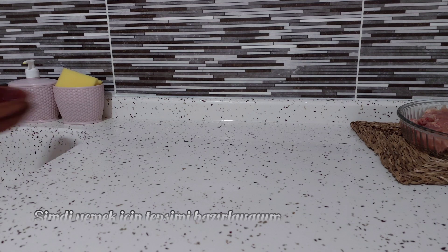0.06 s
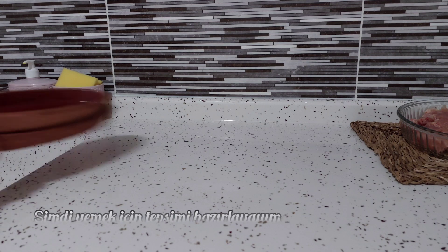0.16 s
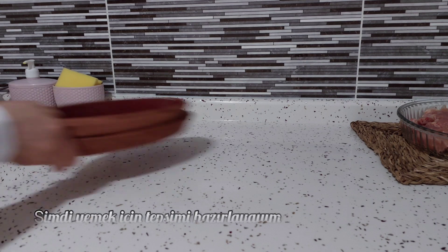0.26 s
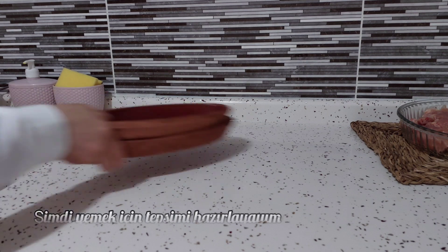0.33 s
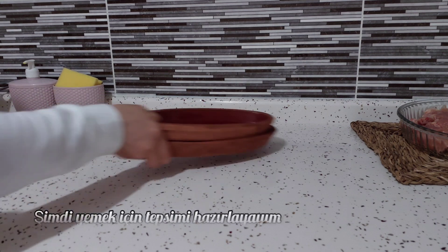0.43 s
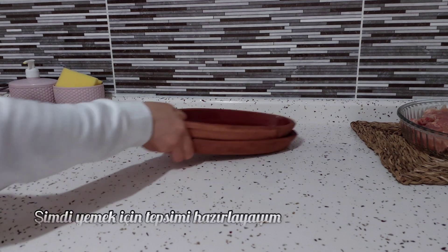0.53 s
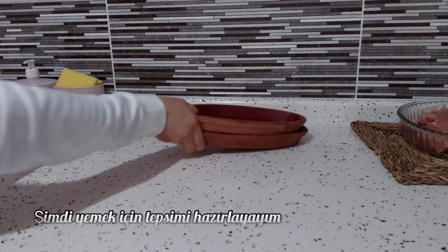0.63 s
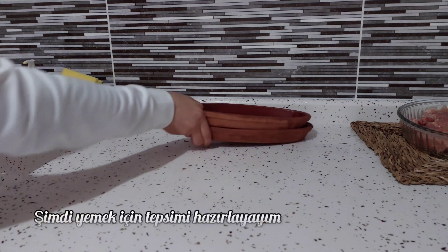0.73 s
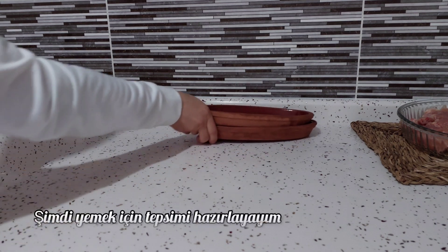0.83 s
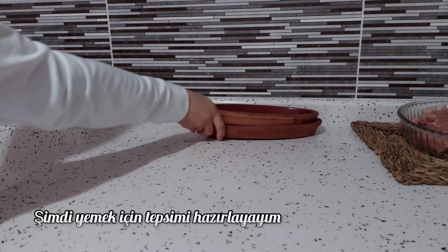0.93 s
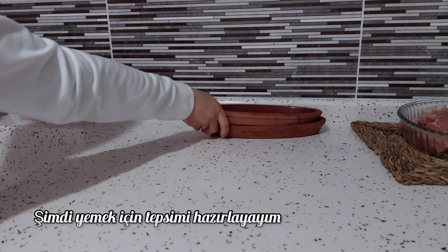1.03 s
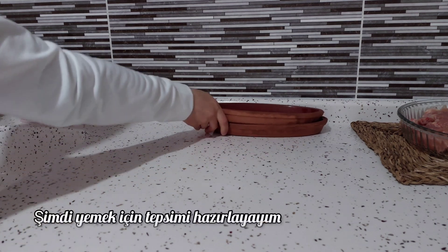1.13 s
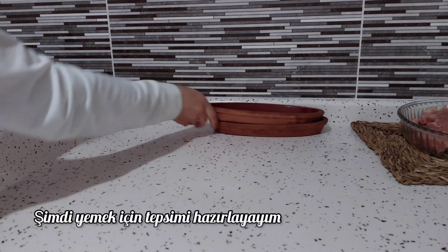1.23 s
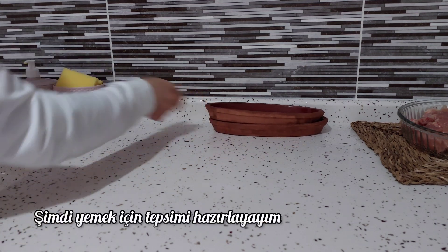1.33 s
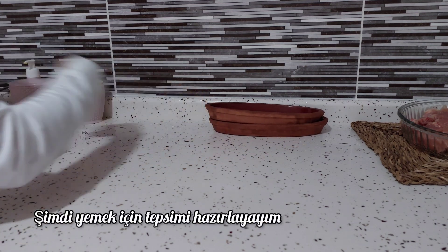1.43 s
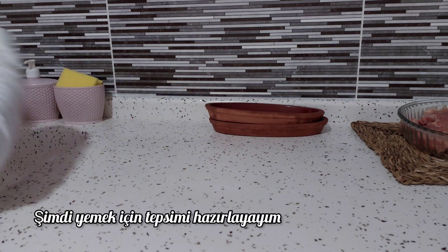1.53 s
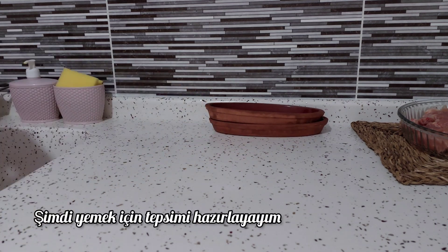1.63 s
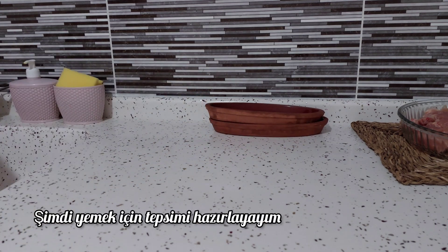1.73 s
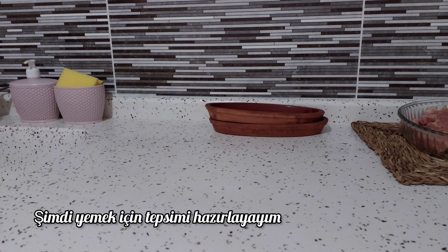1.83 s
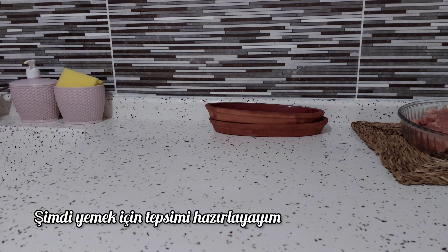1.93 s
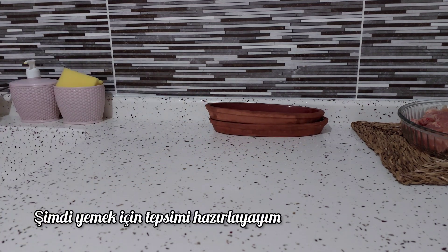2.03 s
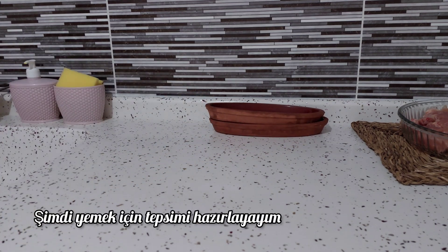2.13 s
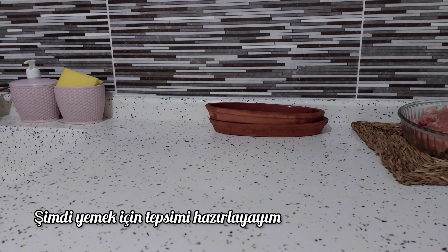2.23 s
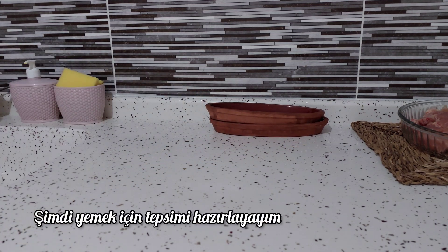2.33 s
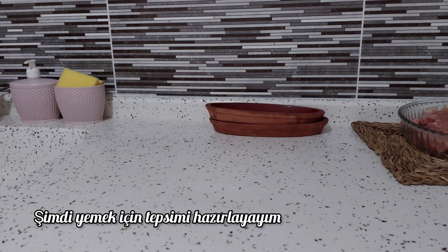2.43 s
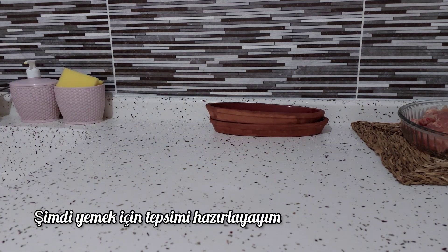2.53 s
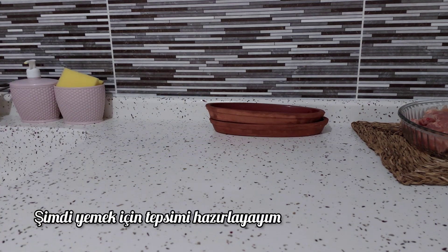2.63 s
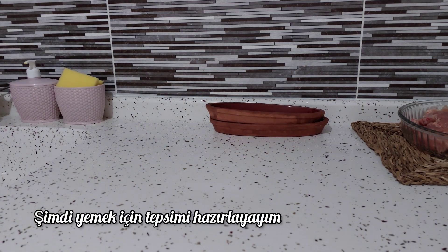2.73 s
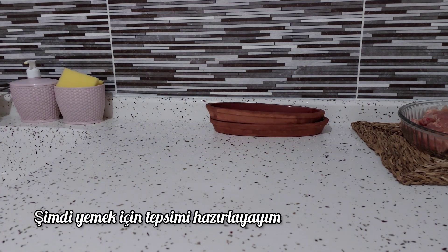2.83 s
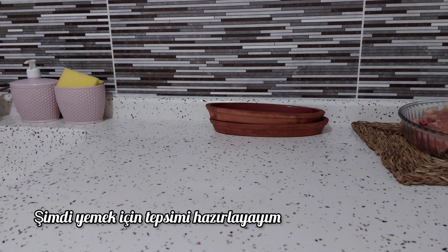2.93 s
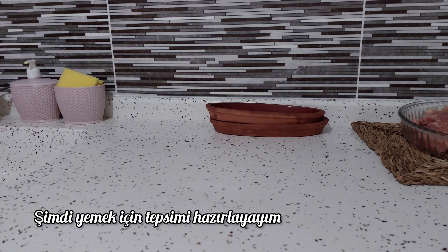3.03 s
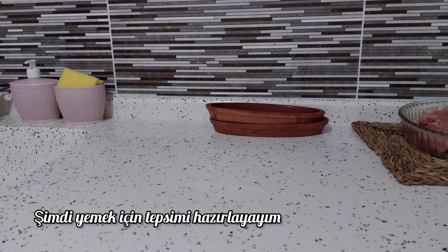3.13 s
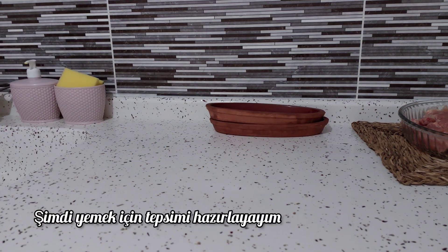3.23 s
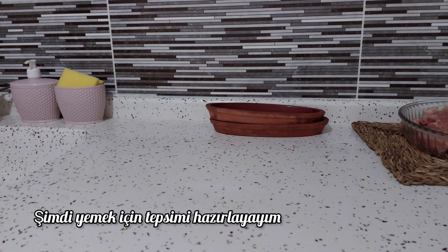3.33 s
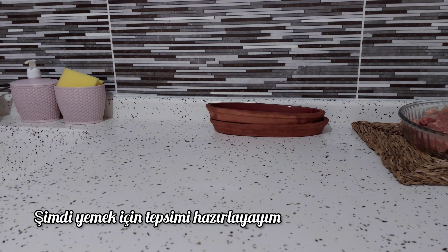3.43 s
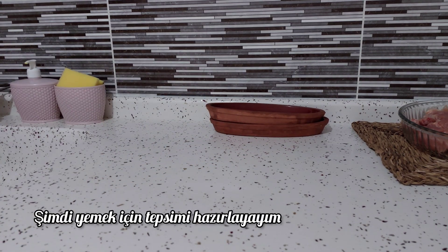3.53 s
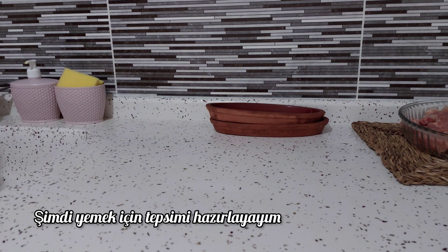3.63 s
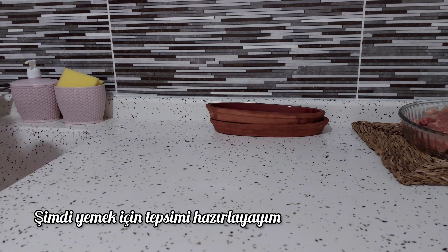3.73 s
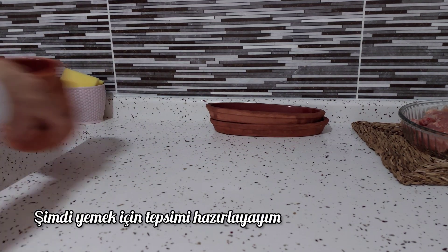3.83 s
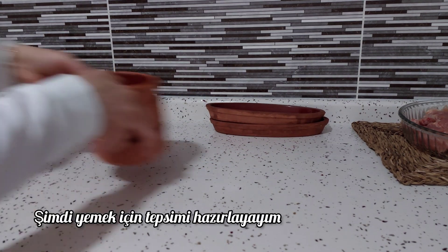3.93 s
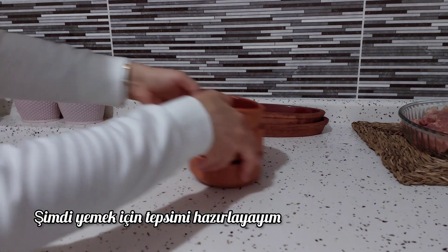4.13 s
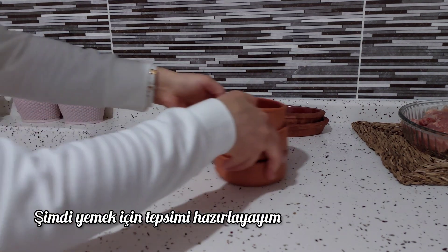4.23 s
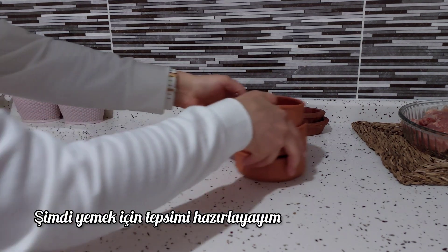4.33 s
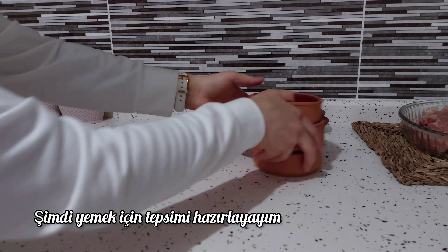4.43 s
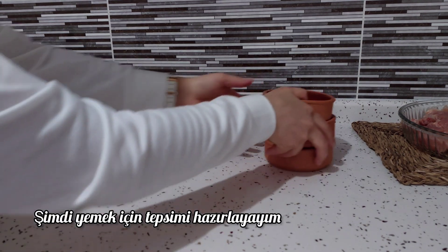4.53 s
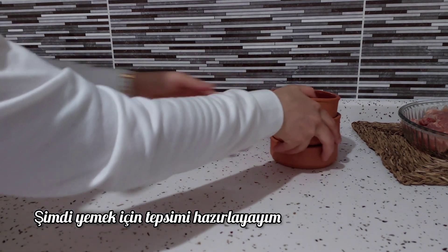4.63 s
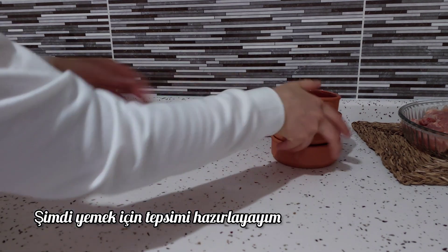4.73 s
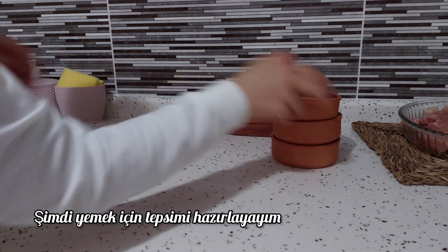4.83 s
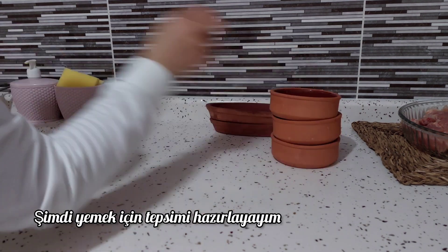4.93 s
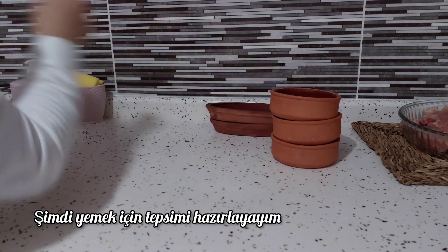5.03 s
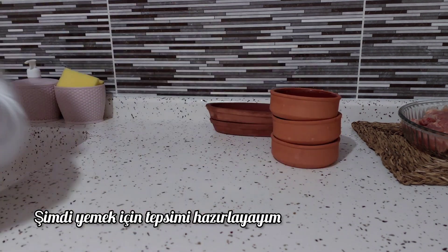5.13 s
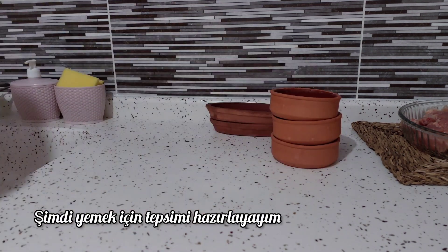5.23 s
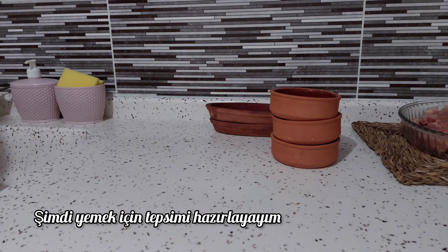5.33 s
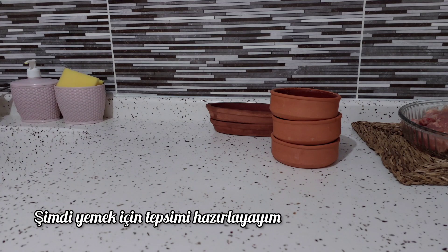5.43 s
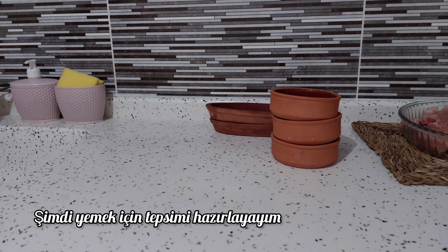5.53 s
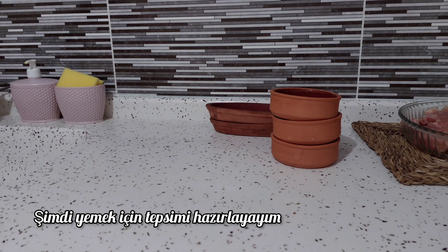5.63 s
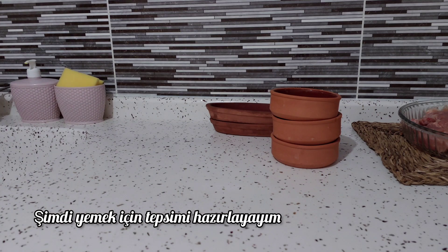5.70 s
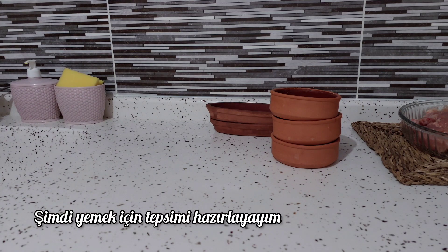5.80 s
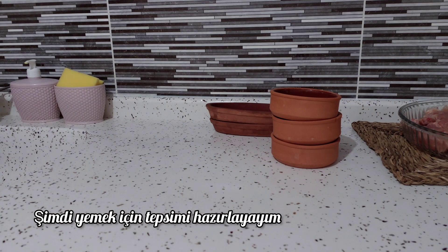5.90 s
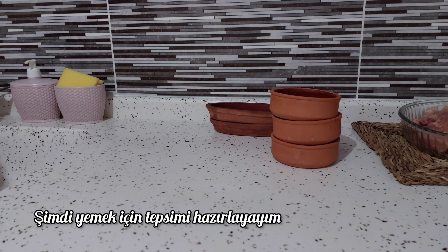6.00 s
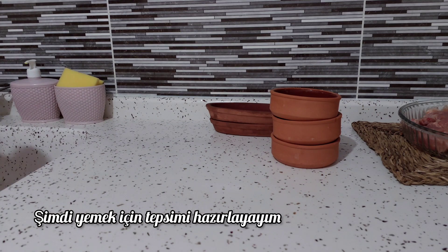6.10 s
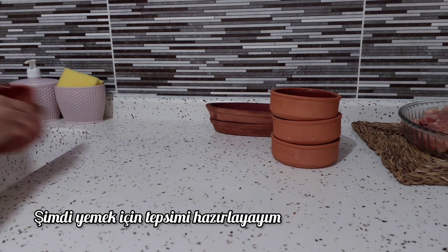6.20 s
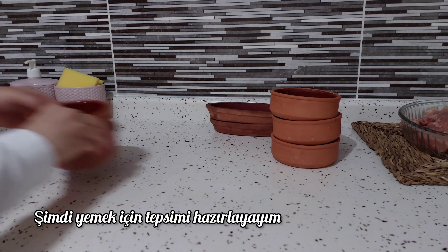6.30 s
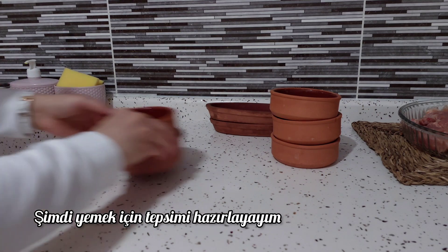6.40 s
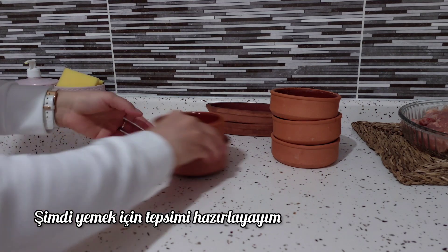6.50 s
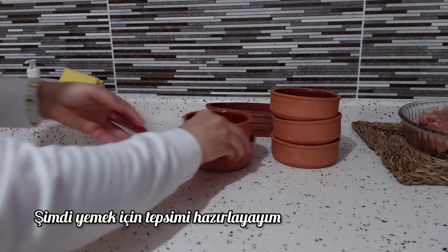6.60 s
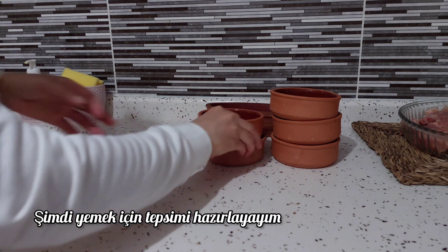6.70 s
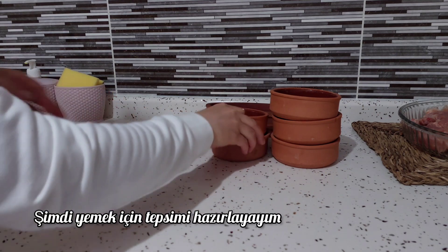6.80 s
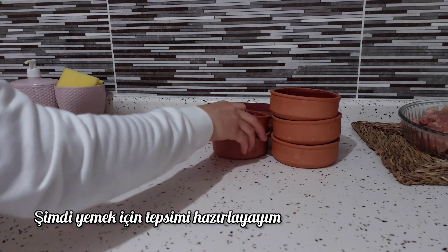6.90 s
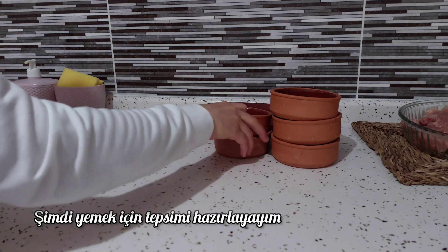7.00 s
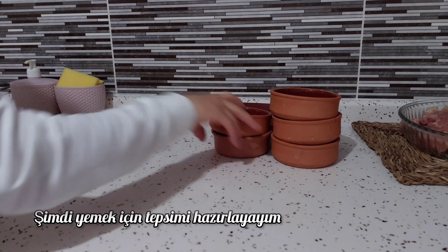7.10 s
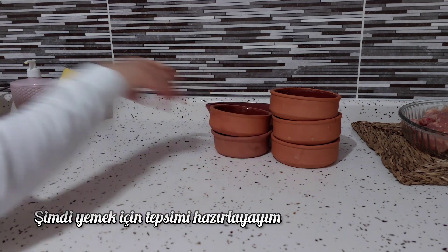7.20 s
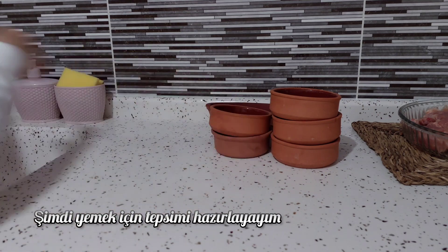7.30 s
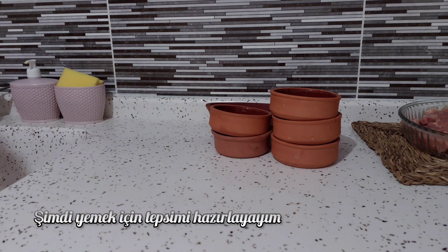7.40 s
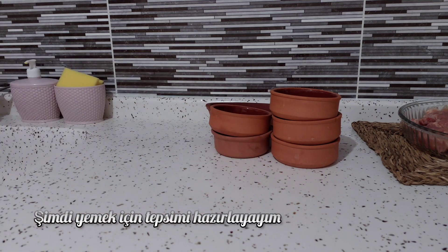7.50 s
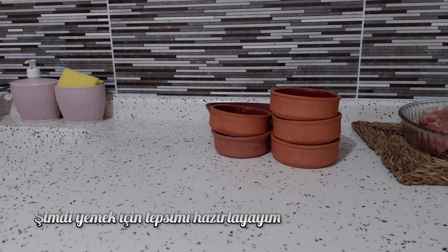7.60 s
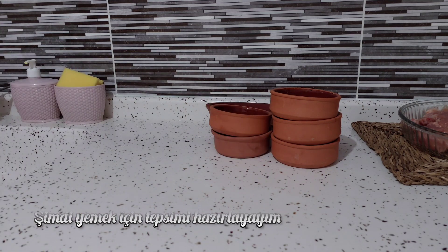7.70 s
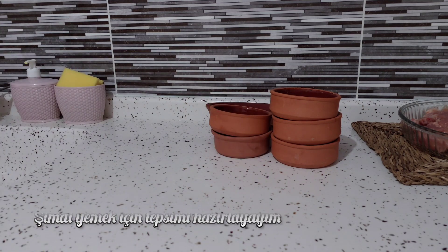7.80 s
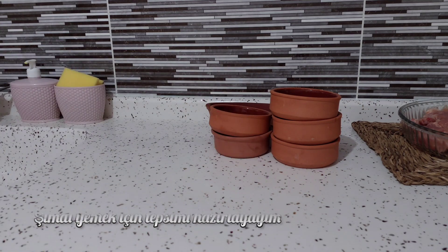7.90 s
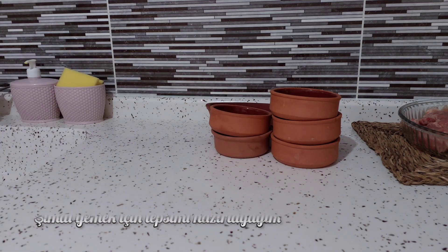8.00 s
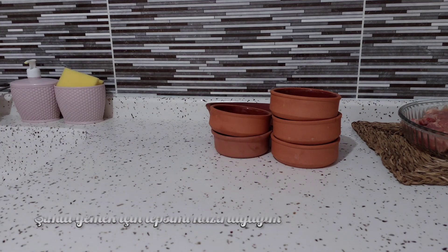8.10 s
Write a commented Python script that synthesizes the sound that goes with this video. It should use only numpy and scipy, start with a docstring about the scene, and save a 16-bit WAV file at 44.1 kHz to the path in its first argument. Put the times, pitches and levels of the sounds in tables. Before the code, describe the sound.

Unglazed clay ware is set down in three loads: dishes with dry clacks, a stack with one solid knock and a fading push, small bowls with livelier, longer-ringing knocks. Between them come duller, more distant cupboard bumps and very quiet scraping of bases and rims. The microphones are close; the tiled room adds a short reverberant tail over quiet low room tone.

```python
"""Clay ware set down on a stone counter

Two nested oval dishes, a stack of three bowls, then two small bowls of unglazed clay land: each contact is a
broadband knock plus damped modes. Between the loads, clay bumps in a cupboard in the same way.
Dragged bases stick and slip, and rubbing rims excite high modes, both as random slips driving resonances.
A hard tiled kitchen answers with decaying diffuse noise, over low room tone, a faint hum and a soft late hiss."""
import sys
import numpy as np
from scipy import signal
from scipy.fft import rfft, irfft, next_fast_len
from scipy.io import wavfile
from scipy.ndimage import map_coordinates

SR = 44100
rng = np.random.default_rng(int(sys.argv[2]) if len(sys.argv) > 2 else 0)


def file_out(sig):
    """Save sig as 16-bit WAV at sys.argv[1]."""
    # one column per channel
    cols = np.atleast_2d(sig).T
    # limit, then scale
    lim = np.clip(cols, -1, 1)
    pcm = np.round(lim * 32767).astype(np.int16)
    wavfile.write(sys.argv[1], SR, pcm)


N = 359415


def knocks(hits, modes, knock, scatter_db, scatter_t60, modes_db, sustain, room_db, left_db):
    """Impact excitation: a brief force gives a dead knock and sets the damped modes of the clay ringing."""
    out, t = np.zeros((2, N)), np.arange(SR) / SR
    hz, width, mode_db = np.transpose(modes)[:, :, None]
    pulse = unit_energy(causal(knock))
    first = causal([(3500, -3.0), (11000, -12)])  # the contact lasts too long for the top treble
    mode_chance_db = 1.5  # standard deviation of a mode's strength
    for s, db, thud_db, pitch_hz, lift_db, bright_db in hits:
        # The push arrives first; counter and tiles scatter it within milliseconds.
        scatter = diffuse(SR) * amp(-60 * t / scatter_t60) * (1 - np.exp(-t / 0.00034))
        push = amp(scatter_db) * unit_energy(scatter)
        push[:, :len(first)] += first
        blow = through(push, pulse)

        # The point of contact decides how strongly each mode rings.
        strength = width / hz * amp(mode_db + mode_chance_db * rng.standard_normal(hz.shape))
        # Each microphone gets its own phase, more so in the treble.
        spread = np.minimum(hz / 3000, 1) * rng.standard_normal((2, len(hz), 1))
        phase = rng.uniform(0, 2 * np.pi, hz.shape) + spread
        early = t[:SR // 4]
        decay = np.exp(-np.pi * width * early / sustain)
        ring = np.sum(strength * decay * np.sin(2 * np.pi * hz * early + phase), axis=1)
        onset = 1 - np.exp(-(early / 0.00057) ** 2)
        radiated = np.diff(ring * onset, prepend=0)  # a small wall radiates little bass
        blow[:, :len(early)] += amp(modes_db) * unit_energy(radiated)

        # A flat landing thuds, an edge clinks, and the spot that touches favours one pitch.
        tilt = causal([(180, thud_db), (450, 0), (2000, 0), (6000, bright_db)])[:SR // 40]
        favoured = [(pitch_hz / np.sqrt(2), 0), (pitch_hz, lift_db), (pitch_hz * np.sqrt(2), 0)]
        contact = np.convolve(tilt, causal(favoured)[:SR // 40])
        blow = 10 * amp(db) * through(blow, contact)
        add(out, s, blow + amp(room_db) * kitchen(blow))
    return out * amp([[left_db / 2], [-left_db / 2]])


def dishes():
    """Modal impact of two nested oval dishes: narrow resonances over a wide-band knock."""
    # Each row: start in seconds, relative level in dB, thud in dB, favoured pitch in Hz, its lift in dB,
    # brightness in dB.
    hits = [(.5352, -25, 0, 860, 4.5, 0), (.5372, -23.5, -0.5, 2504, 2, 3), (.7897, -27, 3, 1564, 10, -6.5),
            (.954, -38, -2, 1500, -4.5, 1.5), (.9625, -23, -5.5, 1450, 4, 1),
            (.9755, -26, -3, 2300, 7.5, 2), (.9773, -24.5, -1.5, 2567, 5, 6)]
    # Modes of the clay. Each row: frequency in Hz, width in Hz before sustain divides it, relative level in dB.
    modes = [(690, 60, -5), (722.2, 45, -3), (892, 15, -2.5), (1193, 50, 3.5), (1310, 70, 0.5),
             (1505, 18, -9), (1830, 60, 1.5), (1905, 88, 0), (2232, 34, 1), (2563, 15, 0), (3210, 30, -4),
             (3754, 26, -9.5), (5442, 50, -14.5), (7200, 34, -22.5)]
    # Knock of clay on its support. Each row: frequency in Hz, relative spectral level in dB per Hz.
    knock = [(30, -33), (90, -14), (160, -15), (240, -22.5), (320, -13), (430, -19), (600, -15.5),
             (800, -8), (1500, -15.5), (1950, -13), (2700, -21.5), (3700, -26.5), (5400, -31),
             (6600, -43.5), (7700, -37), (8900, -48), (15000, -55)]
    return knocks(hits, modes, knock, scatter_db=3.5, scatter_t60=0.027, modes_db=5, sustain=0.75,
                  room_db=0, left_db=1.54)


def stack():
    """Modal impact of three stacked bowls: one firm contact, then two weak and thudding ones."""
    # Each row: start in seconds, relative level in dB, thud in dB, favoured pitch in Hz, its lift in dB,
    # brightness in dB.
    hits = [(4.1678, -20.5, -3, 969, 5.6, 0), (4.279, -36.5, 14, 578, 11.7, -9.5),
            (4.294, -51.5, 17, 650, 8, -10)]
    # Modes of the clay. Each row: frequency in Hz, width in Hz before sustain divides it, relative level in dB.
    modes = [(574, 340, -7), (1091, 37, -9), (1850, 130, -23.5), (2760, 62, -22), (3570, 42, -35),
             (4030, 67, -24.5), (4270, 13, -19.5), (4775, 46, -31), (6440, 88, -17), (7890, 12, -27.5),
             (9400, 30, -31), (12700, 44, -39)]
    # Knock of clay on its support. Each row: frequency in Hz, relative spectral level in dB per Hz.
    knock = [(30, -56.5), (90, -9.5), (160, -4), (250, -7.5), (400, -7.5), (550, 3), (1000, -0.5),
             (1400, 1.5), (1800, 10), (2500, -1.5), (3200, -9.5), (4000, -3), (5400, -31.5), (6500, -25),
             (7400, -37), (11000, -41), (12500, -27), (15000, -58.5)]
    return knocks(hits, modes, knock, scatter_db=4.0, scatter_t60=0.018, modes_db=1.0, sustain=0.87,
                  room_db=1.2, left_db=0.5)


def bowls():
    """Modal impact of two small bowls: their light damping lets the modes ring on."""
    # Each row: start in seconds, relative level in dB, thud in dB, favoured pitch in Hz, its lift in dB,
    # brightness in dB.
    hits = [(6.557, -21, -7, 760, 1.2, 0), (6.5595, -26.5, 6, 750, 9.1, 9),
            (6.6812, -24, -10, 1150, 4.1, -3), (6.7078, -22, -3.5, 1150, 5.5, 5.5),
            (6.7135, -30.5, 1, 800, 2.3, -3)]
    # Modes of the clay. Each row: frequency in Hz, width in Hz before sustain divides it, relative level in dB.
    modes = [(345, 35, -6.5), (357, 67, -4.5), (770, 43, -3), (783, 21, -11.5), (980, 12, -3),
             (1158, 61, -1), (1414, 27, -3), (1780, 15, -6), (2260, 50, -2), (2590, 40, -13),
             (3487, 67, -12.5), (4170, 35, -7.5), (6060, 63, -28.5), (7580, 53, -20.5), (8800, 130, -29),
             (13200, 200, -33.5)]
    # Knock of clay on its support. Each row: frequency in Hz, relative spectral level in dB per Hz.
    knock = [(30, -22), (90, -8.5), (240, -13.5), (350, -28), (520, -9), (760, 3), (1150, -3.5),
             (1700, -2.5), (2400, -7), (4100, -20), (5300, -26.5), (8000, -36.5), (10000, -37.5),
             (15000, -39.5)]
    return knocks(hits, modes, knock, scatter_db=5.5, scatter_t60=0.05, modes_db=2, sustain=1.3,
                  room_db=-3.5, left_db=1.1)


def cupboard():
    """Modal impact of clay in a cupboard further off: strong damping, and more reverberant sound."""
    # Each row: start in seconds, relative level in dB, thud in dB, favoured pitch in Hz, its lift in dB,
    # brightness in dB.
    hits = [(2.214, -67, 6, 800, 14, -27), (2.24, -51.5, 12, 1120, 7.5, -25),
            (2.331, -52, 12.5, 765, 2.5, -28), (2.809, -40, 3, 1960, 1, -9),
            (2.889, -41.5, -4, 716, 7, -29), (2.907, -26, -1, 990, 2, 4), (2.914, -30.5, 5, 1600, 5, 10.5),
            (5.585, -58, 21, 1920, 2, -29), (5.612, -59, 9, 380, 13, -16), (5.632, -73, 21, 374, 25, -8)]
    # Modes of the clay. Each row: frequency in Hz, width in Hz before sustain divides it, relative level in dB.
    modes = [(180, 180, -11), (353, 23, -26.5), (875, 110, -14.5), (1485, 29, -31), (2050, 58, -13),
             (3690, 68, -25), (4080, 60, -23.5), (4770, 100, -47), (6460, 58, -32.5), (7900, 60, -49),
             (9500, 70, -43)]
    # Knock of clay on its support. Each row: frequency in Hz, relative spectral level in dB per Hz.
    knock = [(30, -33), (70, -3), (120, -4.5), (195, 0), (270, -12), (400, -2), (620, 8), (950, 6.5),
             (1400, -1), (2300, -3.5), (3200, -19), (4100, -18.5), (5500, -53), (15000, -54)]
    return amp(1.5) * knocks(hits, modes, knock, scatter_db=0.5, scatter_t60=0.14, modes_db=-2.9, sustain=0.45,
                             room_db=3.0, left_db=1.1)


def sliding(soft_hz=2800, room_db=-4):
    """Stick-slip friction: slips of a dragged base ring the vessel's resonances, and a hard stick squeaks."""
    # The stack's resonances as it is pushed into place.
    # Each row: frequency in Hz, width in Hz, relative level in dB.
    push_modes = [(151, 90, -7), (318, 63, -7.5), (670, 71, -1), (1074, 130, -6), (1470, 500, -8.5),
                  (2090, 250, -16)]
    # Bases dragged over their support. Each row: start in seconds, length in seconds, relative level in dB,
    # low resonance in Hz, high resonance in Hz, level of the high one against the low in dB, width in Hz.
    slides = [(2.227, 0.086, -68, 1100, 2220, -20, 218), (2.46, 0.2, -75, 1098, 2140, -5, 148),
              (3.413, .11, -71.5, 634, 1890, -5.5, 110), (3.51, .18, -75.5, 629, 2020, 1.5, 117),
              (5.91, 0.066, -63.5, 618, 1700, -7, 309), (6.133, 0.098, -68, 656, 2240, -3.5, 100),
              (6.328, 0.11, -58, 975, 2180, -12.5, 150), (6.877, 0.09, -56, 374, 845, -0.5, 231)]
    # Squeaks of a sticking base. Each row: time of the peak in seconds, relative level in dB, pitch in Hz.
    squeaks = [(4.286, -32.5, 593.3), (6.433, -45, 983)]
    push_start_s, push_length_s, push_db, slowing_db_per_s = 4.3, 0.35, -47, 45.5
    squeak_s, squeak_knots_per_s = 0.0084, 120  # time from the peak to 1/e, rate of the phase wobble
    t = np.arange(N) / SR

    # The pushed stack slows to rest.
    slowing = amp(push_db - slowing_db_per_s * np.maximum(t - push_start_s, 0))
    resonances = sum(amp(db) * slipping(hz, width) for hz, width, db in push_modes)
    out = slowing * stroke(push_start_s, push_length_s) * resonances
    for start, length, db, low_hz, high_hz, high_db, width_hz in slides:
        resonances = slipping(low_hz, width_hz) + amp(high_db) * slipping(high_hz, width_hz)
        out += amp(db) * stroke(start, length) * resonances
    for s, db, hz in squeaks:
        phase = 2 * np.pi * hz * t + wobble(squeak_knots_per_s, N)
        out += amp(db) * np.exp(-((t - s) / squeak_s) ** 2) * np.sqrt(2) * np.sin(phase)
    out = filtered(np.array([out, out]), lambda hz: 1 / (1 + (hz / soft_hz) ** 6))
    return out + amp(room_db) * kitchen(out)


def slipping(hz, width_hz):
    """Source-filter principle: uneven slips drive one two-pole resonance, brought to rms 1."""
    slips_per_s, creep = 600, 0.071  # creep: even friction between the slips, as a share of a slip
    pole = np.exp((2j * np.pi * hz - np.pi * width_hz) / SR)
    slips = rng.standard_normal(N) * ((rng.random(N) < slips_per_s / SR) + creep)
    return unit(signal.lfilter([1, 0, -1], np.real(np.poly([pole, pole.conjugate()])), slips))


def rubbing(grains_per_s=900, grit_db=-4, catch_t60=0.024, rub_db=-2, room_db=-5):
    """Friction excitation: tiny slips of gritty rims, and now and then a catch, drive the bowls' high modes."""
    # Strokes of rim on rim. Each row: start in seconds, length in seconds, relative level in dB.
    rubs = [(2.235, .05, -82.5), (2.352, 0.047, -71.5), (2.47, 0.099, -79), (3.349, 0.22, -68),
            (3.515, 0.13, -56.5), (4.296, .18, -62.5), (4.508, 0.16, -72), (5.564, 0.11, -66.5),
            (5.79, 0.09, -69.5), (5.918, 0.042, -54.5), (6.132, 0.13, -64.5), (6.328, 0.11, -58),
            (6.51, 0.032, -63), (6.88, 0.075, -58.5)]
    # Catches in the rubbing. Each row: time of the peak in seconds, relative level in dB.
    catches = [(3.535, -38), (3.586, -39.5), (3.626, -48), (3.676, -51.5), (6.348, -57), (6.389, -56.5)]
    # High modes of the rims. Each row: frequency in Hz, width in Hz, relative level in dB.
    rub_modes = [(3720, 70, -2.5), (4130, 20, -3.5), (4934, 58, -19), (6310, 61, -2), (7920, 60, -6),
                 (9575, 74, -6.5), (9200, 41, -5.5), (12700, 260, -11), (14870, 130, -8.5)]
    # Spectrum of the grit. Each row: frequency in Hz, relative level in dB per Hz.
    rub_colour = [(500, -35.5), (1200, -21.5), (2100, 8.5), (3000, -54), (3900, 12), (5200, -8.5),
                  (6400, 6), (8500, -14.5), (9600, -8.5), (11300, -2.5), (12800, -3), (15800, -4)]
    t = np.arange(N) / SR
    force = sum(amp(rub_db + db) * stroke(start, length) for start, length, db in rubs)
    for s, db in catches:
        rise = np.clip((t - s) / 0.0029 + 1, 0, 1)
        force = force + rise * amp(db - 60 * np.abs(t - s) / catch_t60)

    grains = (rng.random(N) < grains_per_s / SR) * rng.standard_normal((2, N))
    slips = unit(grains) + 1.01 * rng.standard_normal((2, N))  # grains over continuous friction
    short = t[:SR // 8]
    ring = sum(width * amp(db) * np.exp(-np.pi * width * short) * np.cos(2 * np.pi * hz * short)
               for hz, width, db in rub_modes)
    drive = slips * force
    grit = through(drive, unit_energy(causal(rub_colour)))
    rub = through(drive, unit_energy(ring)) + amp(grit_db) * grit
    return 0.35 * amp([[1], [-1]]) * (rub + amp(room_db) * kitchen(rub))  # slightly to the left


def stroke(start, length):
    """Force envelope: a quick attack, a hold with wavering grip, then exponential decay once the push ends."""
    attack_s, release_db_per_s = 0.029, 329
    grip_db, grip_knots_per_s = 3, 45
    t = np.arange(N) / SR - start
    waver_db = grip_db * wobble(grip_knots_per_s, N)
    return np.clip(t / attack_s, 0, 1) * amp(waver_db - release_db_per_s * np.clip(t - length, 0, 1))


def wobble(per_s, size):
    """Band-limited fluctuation: a smooth curve through per_s random knots a second."""
    at = np.arange(size) * per_s / SR
    return map_coordinates(rng.standard_normal(1024), [at], mode="wrap")


def kitchen(x, build_s=.005):
    """Reverberation: diffuse noise builds up quickly and decays in each band, the bass lingering longest."""
    # Reverberation time. Each row: frequency in Hz, time to fall by 60 dB in seconds.
    room_t60 = [(70, 0.96), (200, 0.65), (450, 0.63), (1000, 0.5), (2000, 0.41), (5000, .36), (12000, 0.28)]
    # Strength of the tail. Each row: frequency in Hz, relative level in dB.
    room_gain = [(40, 9.5), (70, 14), (105, 7), (150, 12.5), (205, 8.5), (260, -1), (340, 9), (500, 9.5),
                 (800, 0.5), (2000, 1), (6000, 2), (14000, 0)]
    hz, t, z = signal.stft(diffuse(SR), SR, nperseg=256)
    t60 = along(room_t60, hz)[:, None]
    even_energy = np.sqrt(2 * np.log(1000) / (t60 * SR))  # a longer tail is not a louder one
    fade = amp(along(room_gain, hz)[:, None] - 60 * t / t60) * even_energy
    tail = signal.istft(z * fade, SR, nperseg=256)[1][:, :SR]
    return through(x, tail * (1 - np.exp(-(np.arange(SR) / SR / build_s) ** 2)))


def diffuse(size):
    """Diffuse-field coherence: white stereo noise, alike in the bass and nearly unrelated in the treble."""
    # Each row: frequency in Hz, correlation of left and right (no unit).
    room_alike = [(120, 0.94), (270, 0.69), (500, 0.54), (1500, 0.25), (5000, 0.033)]

    def mid_side(hz):
        """Correlation as an angle: the shares of mid and side at constant power."""
        angle = np.arccos(np.clip(along(room_alike, hz), -1, 1)) / 2
        return np.array([np.cos(angle), np.sin(angle)])

    mid, side = filtered(rng.standard_normal((2, size)), mid_side)
    return np.array([mid + side, mid - side])


def background(air_db=1, hum_db=-1, hiss_db=1):
    """Stationary noise and tones: coloured low room tone, an appliance's hum, and two soft late hiss swells."""
    # Room tone over time. Each row: time in seconds, level in dB before air_db.
    air_level = [(0, -58), (.45, -64), (1.7, -70), (2.3, -61), (3.9, -63), (5.1, -68), (6.3, -63),
                 (7.4, -69.5), (7.9, -65.5)]
    # Spectrum of the room tone. Each row: frequency in Hz, relative level in dB per Hz.
    air_colour = [(22, -33), (45, -8), (70, -2.5), (130, 1), (165, -14), (200, -1.5), (250, -21), (300, -9),
                  (400, -19.5), (470, -14), (600, -23.5), (1000, -33), (2000, -43.5), (4500, -50.5),
                  (7500, -44.5), (15800, -47)]
    # Partials of the hum. Each row: frequency in Hz, level in dB before hum_db.
    hum_partials = [(123.5, -75), (200, -78), (240, -82), (297, -81), (461, -78.5)]
    # Swells of the hiss. Each row: time of the peak in seconds, level in dB before hiss_db.
    hiss_swells = [(7.821, -60), (7.98, -64)]
    # Spectrum of the hiss. Each row: frequency in Hz, relative level in dB per Hz.
    hiss_colour = [(180, -38.5), (300, -9), (477, -9.5), (896, -15.5), (1020, -15.5), (8990, -22),
                   (11900, -21), (15800, -19.5)]
    rise_db_per_s, fall_db_per_s = 230, 115.5
    t = np.arange(N) / SR
    air = unit(filtered(diffuse(N), lambda hz: amp(along(air_colour, hz))))
    hiss = unit(filtered(diffuse(N), lambda hz: amp(along(hiss_colour, hz))))
    swell = sum(amp(db - np.maximum(rise_db_per_s * (s - t), fall_db_per_s * (t - s))) for s, db in hiss_swells)
    hum = sum(np.sqrt(2) * amp(db) * np.sin(2 * np.pi * (hz * t + rng.random())) for hz, db in hum_partials)
    return amp(air_db) * level(air_level) * air + amp(hum_db) * hum + amp(hiss_db) * swell * hiss


def amp(db):
    """Logarithmic level: decibels to amplitude gain."""
    return 10 ** (np.asarray(db) / 20)


def unit(x):
    """Effective value: x scaled to rms 1."""
    return x / np.sqrt(np.mean(x ** 2) + 1e-20)


def unit_energy(x):
    """Energy normalization: x with a mean energy of 1 per channel."""
    return unit(x) / np.sqrt(x.shape[-1])


def along(points, hz):
    """Logarithmic frequency scale: (Hz, value) points interpolated on a log axis."""
    f, v = np.transpose(points)
    return np.interp(np.log(hz + 1), np.log(f + 1), v)


def level(rows):
    """Level envelope: gain per sample, linear in dB between (s, dB) rows."""
    s, db = np.transpose(rows)
    return amp(np.interp(np.arange(N) / SR, s, db))


def filtered(x, response):
    """Linear filtering: the spectrum of x times a response of frequency."""
    n = x.shape[-1]
    m = next_fast_len(n + 8192)
    return irfft(rfft(x, m) * response(np.fft.rfftfreq(m, 1 / SR)), m)[..., :n]


def causal(points, size=4096):
    """Minimum phase: folding the cepstrum of a (Hz, dB) spectrum gives a causal impulse response."""
    cepstrum = irfft(np.log(amp(along(points, np.fft.rfftfreq(size, 1 / SR)))))
    cepstrum[1:size // 2] *= 2
    cepstrum[size // 2 + 1:] = 0
    return irfft(np.exp(rfft(cepstrum)))


def through(x, response):
    """Convolution: stereo x through an impulse response, cut to the length of x."""
    return signal.fftconvolve(x, np.atleast_2d(response), axes=1)[:, :x.shape[1]]


def add(out, s, x):
    """Superposition: mix x into out from time s in seconds."""
    part = out[:, round(s * SR):][:, :x.shape[1]]
    part += x[:, :part.shape[1]]


def scene():
    """Superposition of the three loads, the cupboard, the friction sounds and the background."""
    return dishes() + stack() + bowls() + cupboard() + sliding() + rubbing() + background()


def record(dry, mono_hz=260, rumble_hz=32, top_hz=15800):
    """Close microphone pair: long waves reach both alike; rumble rolls off and the band ends at top_hz."""
    left, right = signal.sosfilt(signal.butter(2, rumble_hz, "highpass", fs=SR, output="sos"), dry)
    mid, side = (left + right) / 2, (left - right) / 2
    side = filtered(side, lambda hz: hz / np.hypot(hz, mono_hz))
    stereo = np.array([mid + side, mid - side])
    return filtered(stereo, lambda hz: 1 / np.sqrt(1 + (hz / top_hz) ** 200))


dry = scene()
out = record(dry)
file_out(out)
```